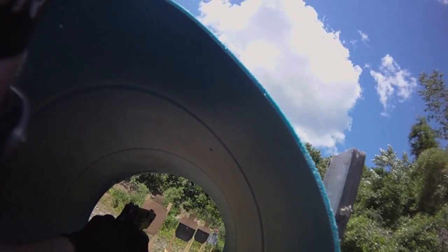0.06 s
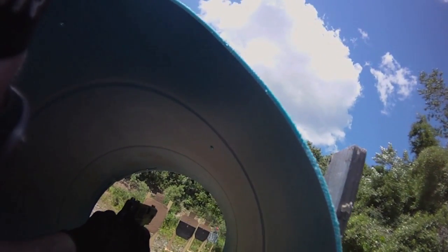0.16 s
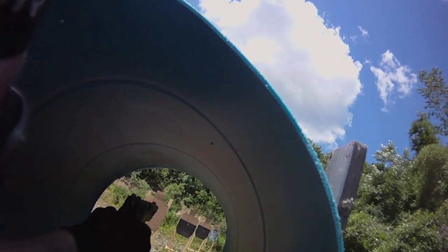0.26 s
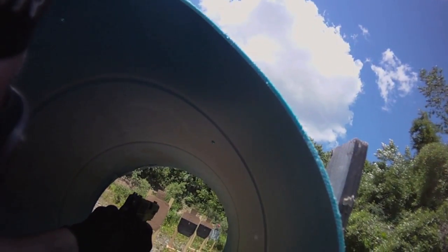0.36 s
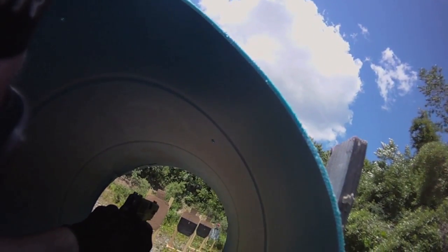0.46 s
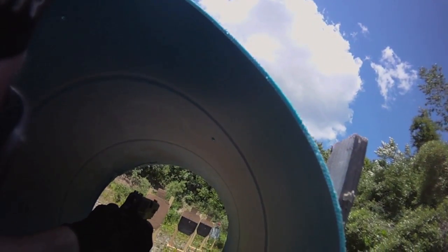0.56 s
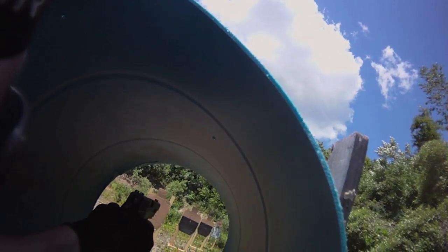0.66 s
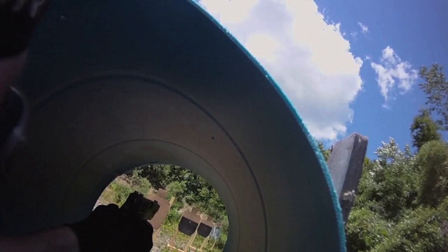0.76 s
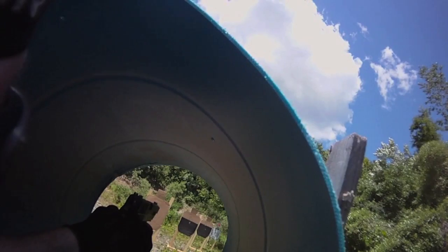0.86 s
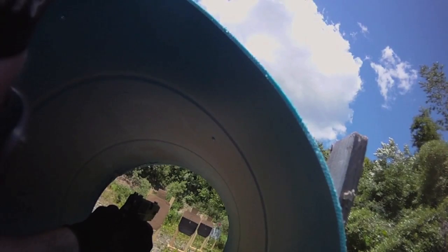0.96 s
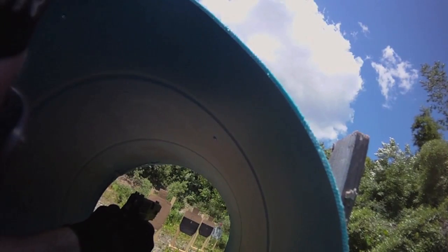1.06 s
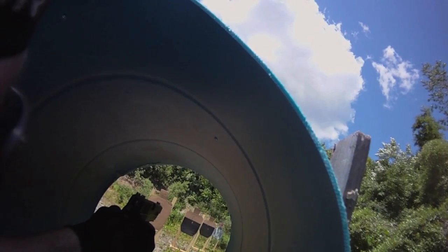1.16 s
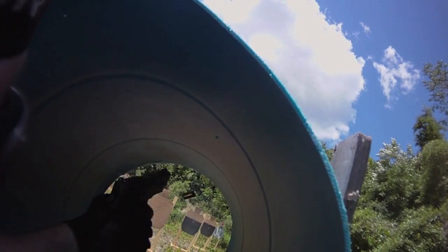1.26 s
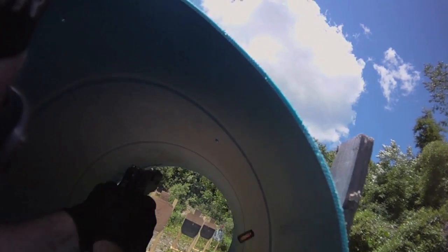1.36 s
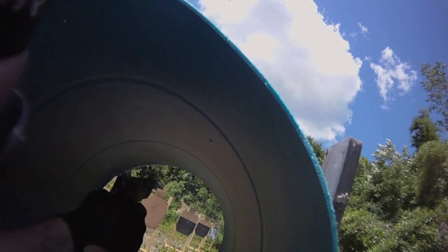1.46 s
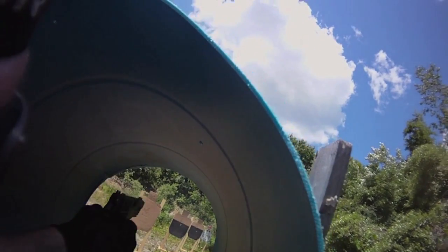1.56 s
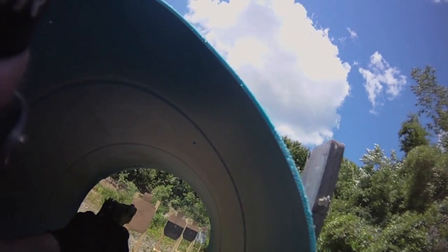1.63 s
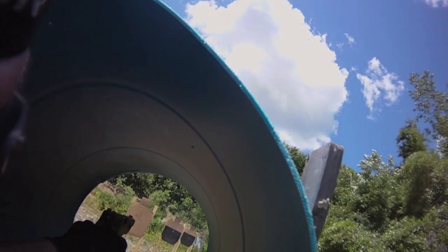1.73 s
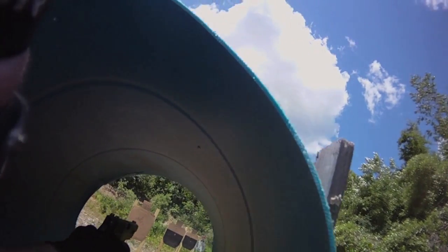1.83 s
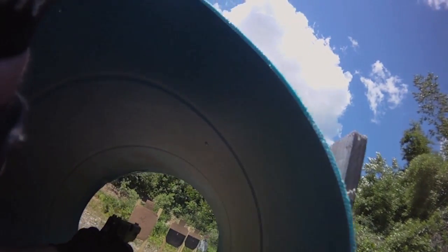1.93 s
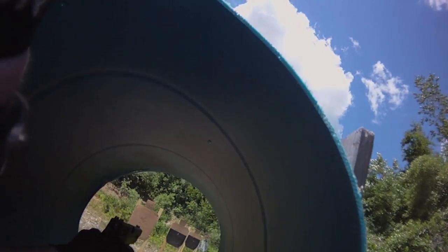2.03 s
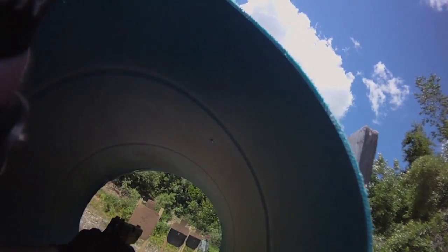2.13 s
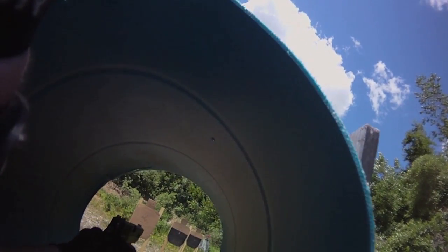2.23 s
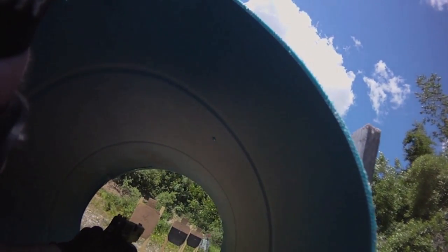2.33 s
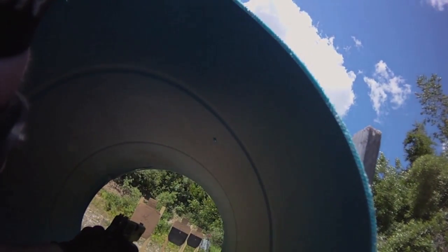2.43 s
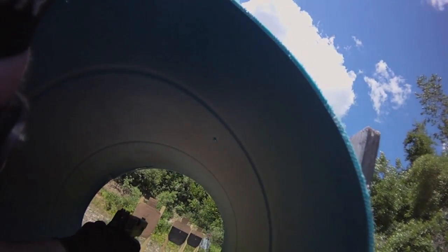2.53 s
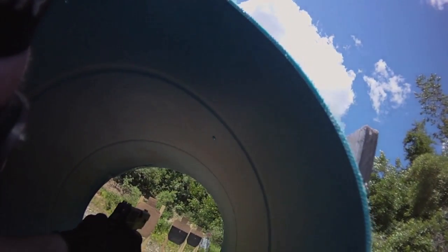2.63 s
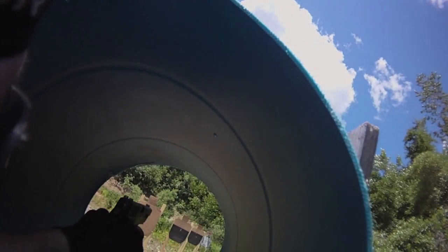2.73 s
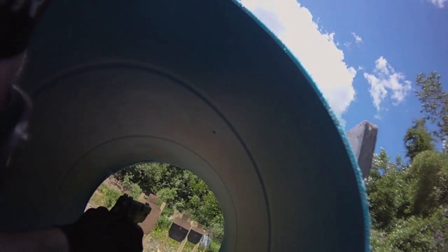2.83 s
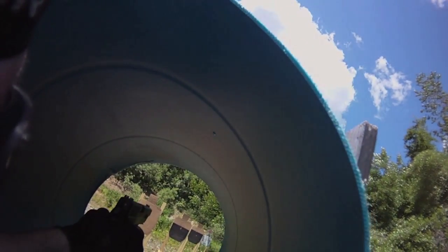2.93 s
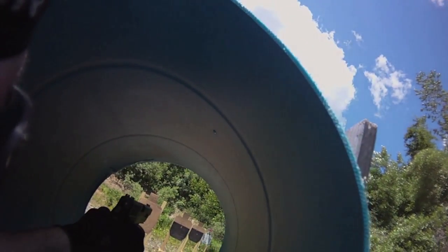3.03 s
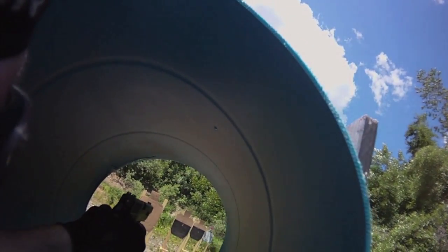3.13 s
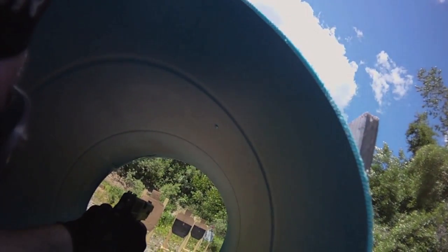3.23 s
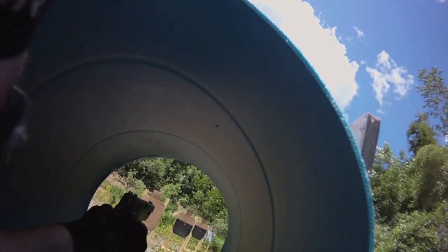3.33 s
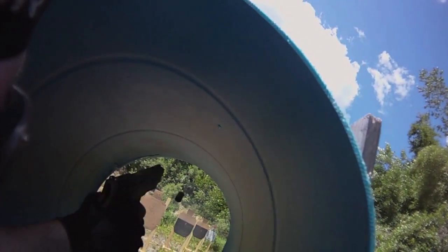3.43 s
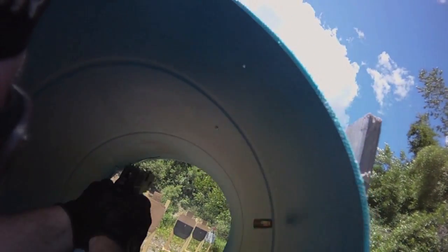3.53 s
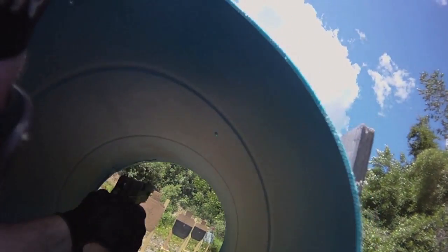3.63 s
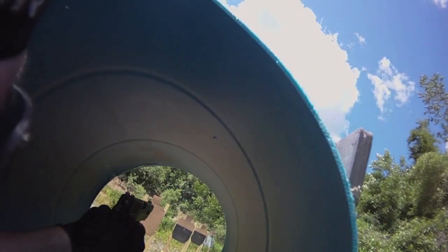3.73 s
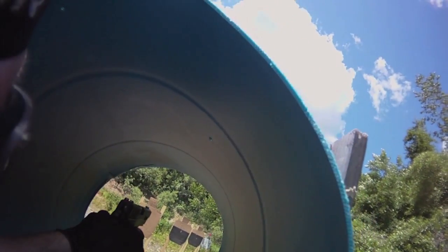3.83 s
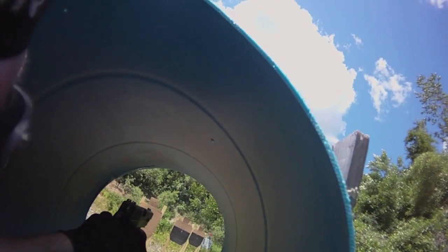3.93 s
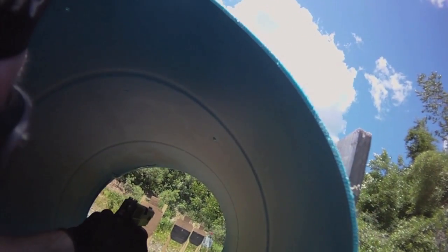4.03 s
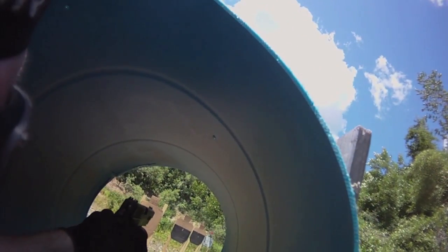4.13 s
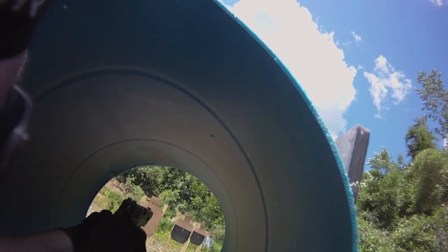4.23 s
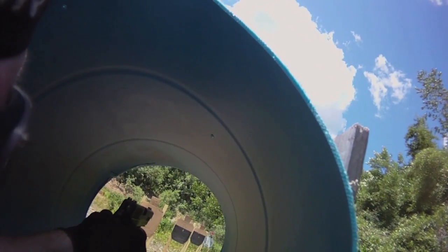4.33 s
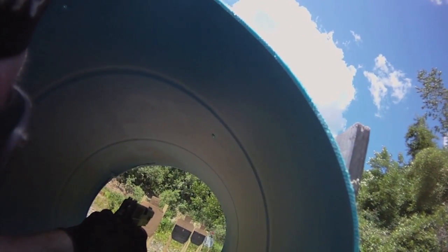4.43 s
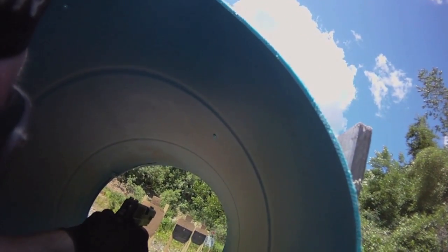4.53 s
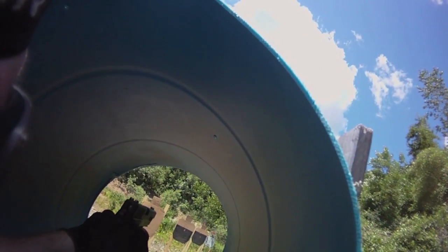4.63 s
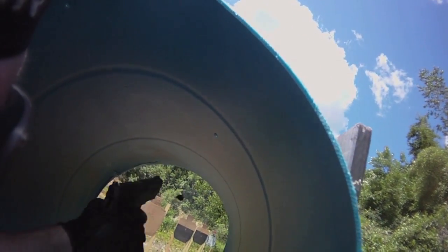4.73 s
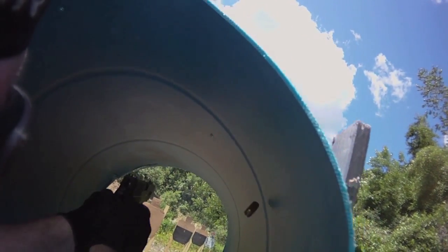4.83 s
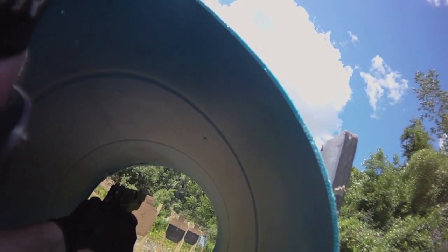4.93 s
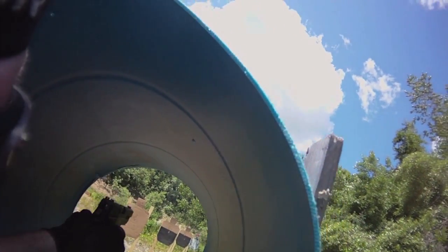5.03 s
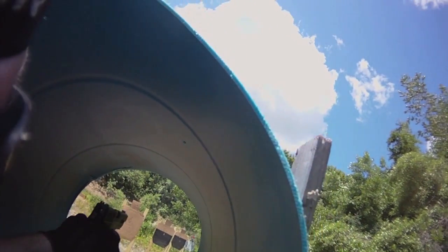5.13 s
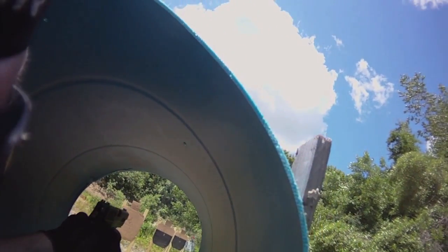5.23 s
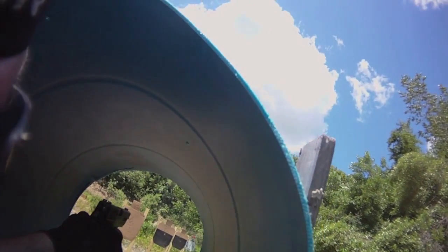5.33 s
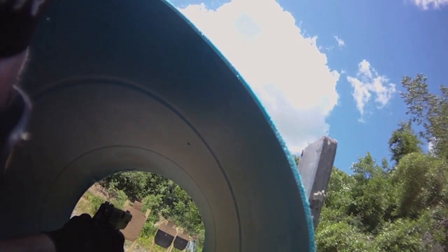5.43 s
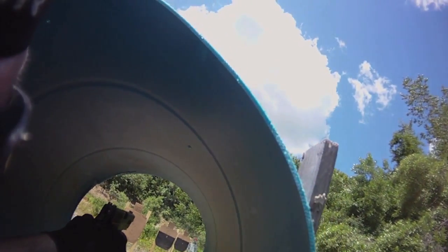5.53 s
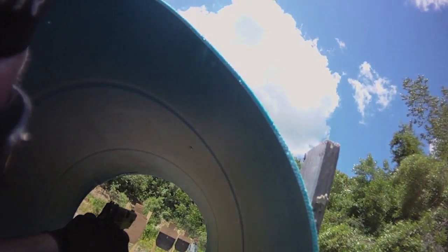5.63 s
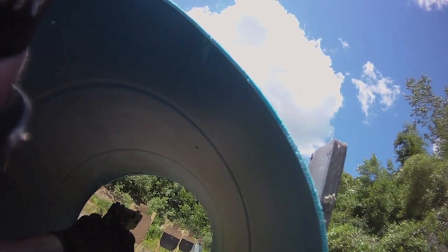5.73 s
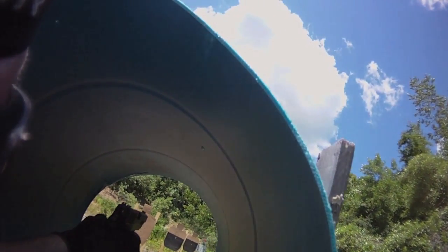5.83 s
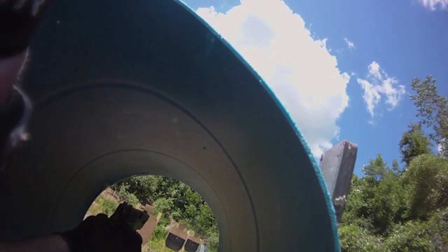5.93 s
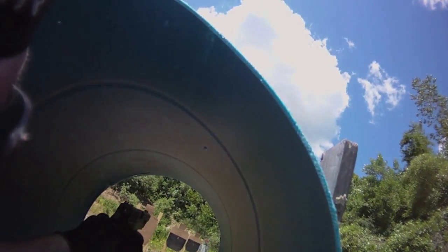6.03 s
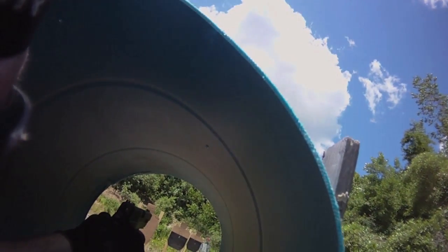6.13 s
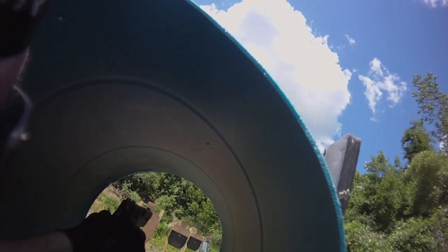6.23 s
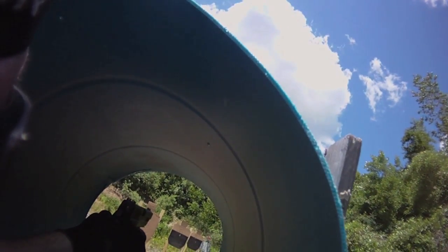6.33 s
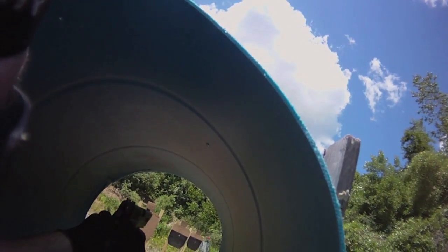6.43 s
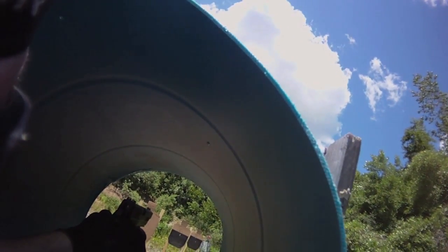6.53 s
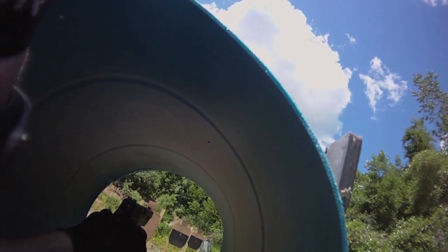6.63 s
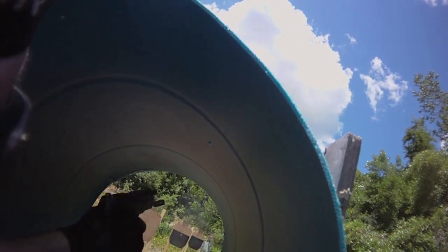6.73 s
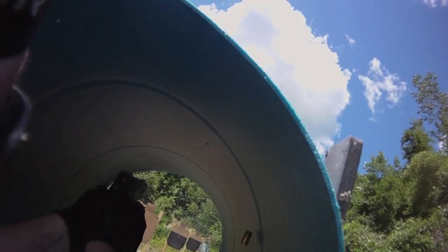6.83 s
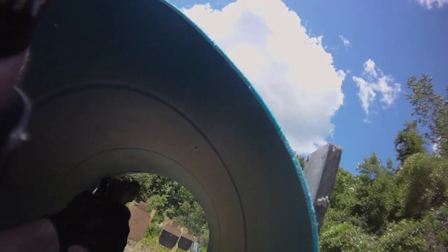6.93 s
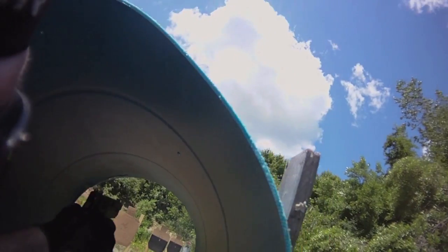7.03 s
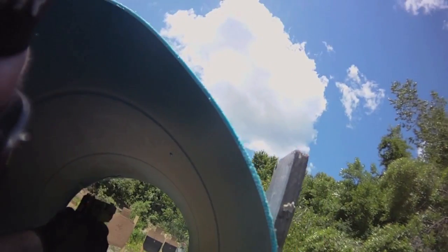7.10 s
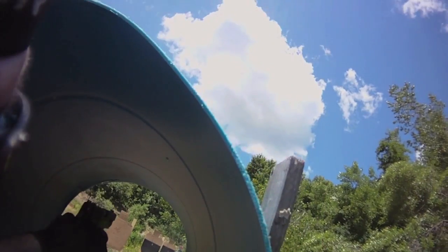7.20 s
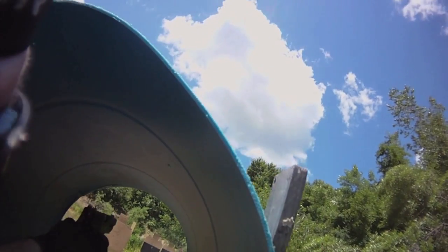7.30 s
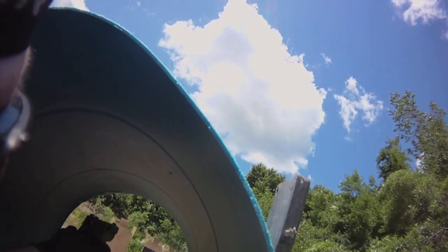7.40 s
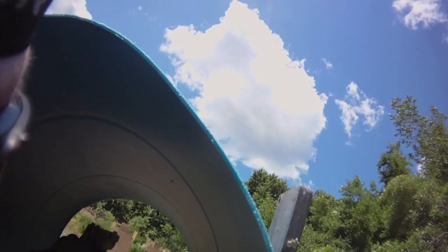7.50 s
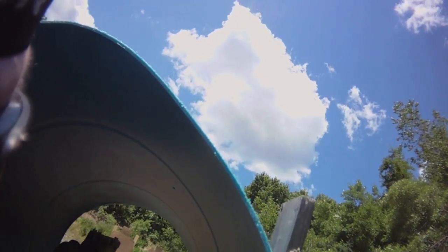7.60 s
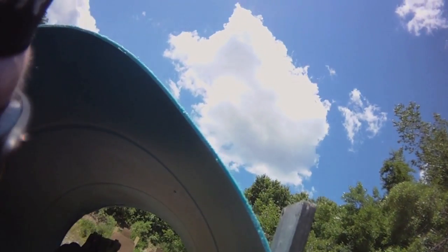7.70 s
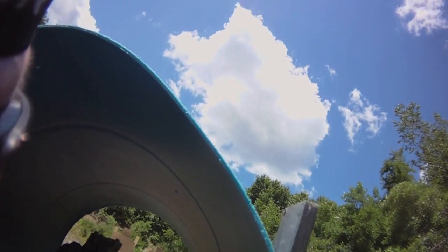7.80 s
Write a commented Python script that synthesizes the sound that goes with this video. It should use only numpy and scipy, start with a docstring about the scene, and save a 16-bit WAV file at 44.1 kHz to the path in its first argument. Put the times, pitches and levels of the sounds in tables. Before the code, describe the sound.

Four loud, hollow pistol shots fired through a plastic barrel outdoors, each echoing away and followed by brass cases clattering and tinkling.

```python
"""An outdoor shooting range, heard at the mouth of a plastic barrel through which a pistol fires four times.
Each blast excites the barrel's air modes, overloads the microphone's limiter and scatters back from
trees and hills. Spent brass cases strike the wall, bounce and ring. Two shots arrive from other bays,
small birds call faintly over a distant rumble, and the barrel is lightly bumped and scuffed."""
import sys
import numpy as np
from scipy import signal
from scipy.fft import rfft, irfft
from scipy.io import wavfile
from scipy.ndimage import uniform_filter1d

SR = 44100
rng = np.random.default_rng(int(sys.argv[2]) if len(sys.argv) > 2 else 0)


def store_wav(level_fs):
    """Save 16-bit WAV to argv[1]."""
    pcm = np.round(np.clip(np.atleast_2d(level_fs), -1, 1) * 32767)
    wavfile.write(sys.argv[1], SR, pcm.T.astype(np.int16))


N = 346626


def gain_of(db):
    """Amplitude ratio of a level; all table levels are relative."""
    return 10 ** (np.asarray(db) / 20)


def unit_rms(x):
    """Normalisation to unit power."""
    return x / np.sqrt(np.mean(x ** 2) + 1e-20)


def clock(length):
    """Sample times over a length in seconds."""
    return np.arange(int(length * SR)) / SR


def add(mix, onset, sound):
    """Superposition: a sound joins the mix at an onset in seconds."""
    part = mix[max(round(onset * SR), 0):][:len(sound)]
    part += sound[:len(part)]


def at_hz(table, hz, column=1):
    """Interpolation of a table column over log frequency."""
    columns = np.transpose(table)
    return np.interp(np.log(hz + 1), np.log(columns[0] + 1), columns[column])


def wander(t, samples):
    """Random fluctuation: a moving average of noise, at unit rms."""
    return unit_rms(uniform_filter1d(rng.standard_normal(len(t)), size=samples))


def hiss(spectrum):
    """Stationary noise with a given spectral density."""
    colour = gain_of(at_hz(spectrum, np.fft.rfftfreq(N, 1 / SR)))
    return irfft(rfft(rng.standard_normal(N)) * colour, N)


def burst(bands, t, hold=0, tilt_db=0, size=512):
    """Frequency-dependent damping: noise holds, then decays band by band. Tilt is in dB per octave."""
    frames = dict(fs=SR, nperseg=size, noverlap=size * 3 // 4)
    hz, times, noise = signal.stft(rng.standard_normal(len(t)), **frames)
    colour_db = at_hz(bands, hz) + tilt_db * np.log2((hz + 100) / 3000)
    fall_db = 60 * np.maximum(times - hold, 0) / at_hz(bands, hz, column=2)[:, None]
    return signal.istft(noise * gain_of(colour_db[:, None] - fall_db), **frames)[1][:len(t)]


def ring(modes, t, phase=0):
    """Free vibration: one damped sinusoid per mode, each in its own row."""
    hz, db, t60 = np.transpose(modes)[:, :, None]
    return gain_of(db - 60 * t / t60) * np.cos(2 * np.pi * hz * t + phase)


def cut(x, hz, kind):
    """Fourth-order high-pass or low-pass filtering."""
    return signal.sosfilt(signal.butter(4, hz, kind, fs=SR, output="sos"), x)


# Spectral densities of still air and distant rumble: f/Hz, level/dB
AIR_SPECTRUM = [(18, -51.5), (30, -16), (108, -7.5), (208, -12), (420, -2.5), (532, -0.5), (1140, -12.5),
                (1360, -7), (2130, -13.5), (2550, -11.5), (2990, -15.5), (4090, -14.5), (6210, -18),
                (14300, -21.5), (15500, -29.5)]
RUMBLE_SPECTRUM = [(60, -23), (280, -15.5), (560, 5.5), (750, -4.5), (1100, -11.5), (2200, -13),
                   (4000, -24), (5500, -37), (12000, -45.5)]
# Envelope of the rumble: t/s, level/dB
RUMBLE_ENVELOPE = [(0, -42), (.3, -45.5), (1.202, -53), (2.003, -57.5), (2.9, -66.5), (6.4, -67),
                   (6.751, -59), (7.8, -49.5)]
def background(air_db=-70.5):
    """Ambient noise: steady summer air under a distant rumble that fades and returns."""
    rumble_db = np.interp(np.arange(N) / SR, *np.transpose(RUMBLE_ENVELOPE))
    return gain_of(air_db) * unit_rms(hiss(AIR_SPECTRUM)) + gain_of(rumble_db) * hiss(RUMBLE_SPECTRUM)


# Air modes of the barrel, apart from its beating pair: f/Hz, level/dB, T60/s
BARREL_MODES = [(170, -16, .42), (630, -3, .13), (732, -4, .28), (996, 2, .22), (1262, 2, .21),
                (1525, 0, .14), (1700, 3, .1), (1764, -2, .25), (1812, 5, .11), (1953, 7, .115),
                (2049, 1.5, .25), (2200, 2, .1), (2334, 8, .11), (2500, 5, .145), (2742, -1, .22),
                (2782, 5, .15), (2950, 1, .1), (3028, -.5, .29), (3130, 6, .11), (3309, -4, .3),
                (3400, 2, .1), (3540, 7, .105), (3605, 5, .135), (3715, 3.5, .115), (3864, 0, .19),
                (4030, 1, .1), (4120, -4, .17), (4480, -3, .16)]
def barrel_resonance(x, resonance_db=-4):
    """Forced vibration: outside sound weakly drives the cavity's modes and turns hollow."""
    response = ring(BARREL_MODES, clock(.4)).sum(0)
    response /= abs(rfft(response)).max()
    return x + gain_of(resonance_db) * signal.fftconvolve(x, response)[:N]


def wall_reflections(x, count=10):
    """Comb filtering: treble reflects around the curved wall and interferes with the direct sound."""
    taps = np.zeros(600)
    taps[rng.integers(20, 450, count)] = .16 * rng.choice([-1, 1], count)
    return x + signal.oaconvolve(x, cut(taps, 4300, "high"))[:N]


# Bird notes: t/s, start f/Hz, end f/Hz, level/dB
BIRD_NOTES = [(.085, 3940, 4200, -67), (.64, 6300, 6500, -69), (.895, 3520, 3000, -58.5),
              (.985, 2310, 2090, -64), (2.4, 4800, 5200, -68), (2.715, 2134, 1900, -66.5)]
def bird(start_hz, end_hz, db, note_s=.033):
    """Scattering by foliage blurs a short gliding whistle."""
    hz = np.linspace(start_hz, end_hz, len(clock(note_s)))
    note = np.sin(2 * np.pi * np.cumsum(hz) / SR) * np.hanning(len(hz))
    delay = clock(.3)
    leaves = rng.standard_normal(len(delay)) * np.exp(-delay / .05)
    paths = (delay == 0) + .33 * leaves / np.linalg.norm(leaves)
    return gain_of(db) * signal.fftconvolve(note, paths)


# Modes of an empty brass case: f/Hz, level/dB, T60/s
BRASS_MODES = [(11370, -3.5, 0.41), (11400, -7, 0.08)]
def tinkle(db, detune=.0042, tumble_hz=38, settle_db=-13, settle_s=.065):
    """Amplitude modulation: tumbling flutters the ring of a case, soon damped to a faint afterring."""
    t = clock(.4)
    flutter = 1 + .35 * np.sin(2 * np.pi * (tumble_hz * t + rng.random()))
    damped_db = settle_db * (1 - np.exp(-(t / settle_s) ** 2))
    brass = ring(BRASS_MODES, t * (1 + detune * rng.standard_normal())).sum(0)
    return gain_of(db + damped_db) * flutter * brass


# Noise bands of a metal click and of the wall's rattle: f/Hz, level/dB, T60/s
CLICK_BANDS = [(150, -34, 0.018), (500, -12.5, 0.022), (1200, -15.5, 0.014), (2480, 1, 0.017),
               (4800, -2, .014), (8200, -10, 0.0063), (15300, -18.5, 0.015)]
RATTLE_BANDS = [(151, -85, 0.07), (564, -3, 0.15), (985, -7, 0.11), (2500, -3.5, 0.16), (4200, -10, 0.11),
                (8200, -19, .09), (15000, -32, .08)]
def contact(db, flat_db, tilt_db, rattle_db=7.5):
    """Impact excitation: a case clicks on the barrel and the wall answers hollowly."""
    t = clock(.3)
    click = burst(CLICK_BANDS, t, hold=.0014, tilt_db=tilt_db, size=128)
    rattle = gain_of(rattle_db + flat_db) * burst(RATTLE_BANDS, t, tilt_db=tilt_db)
    return gain_of(db) * cut(click + rattle, 380, "high")  # click and rattle carry nothing below about 380 Hz


# Landings: t/s, impact level/dB, flatness (0 on the rim, 1 on the side), ring level/dB, tilt/(dB/octave)
CASE_LANDINGS = [(.19, -49.5, 0, -63, 6), (1.5778, -12, 0.44, -38, -4), (1.7195, -24.5, .1, -52, -5),
                 (1.7355, -18.5, 0.47, -60, -2), (1.8582, -28, 0.99, -60, -6.5),
                 (2.593, -49.5, 0.27, -65, -2), (3.599, -8, 0.59, -40, -4),
                 (3.7688, -13.5, 0.58, -53, -3.5), (4.9122, -18, 0.16, -39, 0.5),
                 (5.0439, -24.5, 0.21, -54, 2), (5.1163, -8, 0.13, -34, -3.5),
                 (5.228, -23.5, 0.81, -56, -5.5), (5.995, -43.5, 0.56, -73, -7.5),
                 (6.1709, -30.5, 0.13, -59, -7.5), (7.063, -12.5, 0, -58, -5.5),
                 (7.0873, -15.5, 0.35, -51, -2.5), (7.2015, -23.5, 0.37, -27, 3),
                 (7.6016, -40.5, 0.12, -49, -7)]
# The other end slaps down, then the case hops: delay t/s, level/dB
REBOUNDS = [(.012, -4), (.043, -7)]
def case_landing(db, flatness, brass_db, tilt_db, rim_db=-22, rebound_rattle_db=-5):
    """Inelastic collision: a case lands and rings; the flatter it falls, the more it rattles and hops."""
    flat_db = rim_db * (1 - np.clip(flatness, 0, 1))
    sound = tinkle(brass_db)
    add(sound, 0, contact(db, flat_db, tilt_db))
    for delay, rebound_db in REBOUNDS:
        add(sound, delay, contact(db + rebound_db + flat_db, flat_db + rebound_rattle_db, tilt_db))
    return sound


def thump(t, push_s=.0025, top_hz=170):
    """A pressure pulse rounded by distance: compression, then a longer rarefaction."""
    return cut((1 - t / push_s) * np.exp(-t / push_s), top_hz, "low")


# A distant shot's thud modes in the barrel, crack bands and tail bands: f/Hz, level/dB, T60/s
THUD_MODES = [(115, -22, .07), (720, -7, .045), (890, -14, .065)]
CRACK_BANDS = [(40, -18, 0.058), (130, 9, 0.025), (300, 4, 0.032), (534, 10, 0.22), (870, 17.5, 0.034),
               (1220, -40, 0.065), (1700, 5, 0.045), (4030, -47, 0.017), (5340, -46, 0.022),
               (12000, -64, .05)]
TAIL_BANDS = [(50, -52, .5), (120.4, -11.5, .35), (293.6, -25.5, 4.5), (575.4, 0.5, 3), (1080, -18, 1.7),
              (1570, -13, 1.6), (3882, -28, 0.64), (5200, -46.5, 0.83), (11700, -74, 0.49)]
# Shots in other bays: t/s, crack level/dB, tail level/dB, tilt/(dB/octave), bass level/dB
DISTANT_SHOTS = [(.311, -33, -21.5, 2.5, -37), (7.728, -12.5, -16, 2, -29)]
def distant_shot(crack_db, tail_db, tilt_db, bass_db, echo_s=.055):
    """Reflection and scattering: a dull crack, one slap echo from a berm, and a long uneven tail."""
    t = clock(2.5)
    thud = ring(THUD_MODES, t, np.pi / 2).sum(0)
    snap = burst(CRACK_BANDS, t, hold=.0057, tilt_db=tilt_db, size=256)
    crack = gain_of(crack_db) * (thud + gain_of(-4) * snap)
    bass = gain_of(bass_db) * thump(t)
    lumps_db = 1.7 * wander(t, samples=500)
    tail = gain_of(tail_db + lumps_db) * burst(TAIL_BANDS, t, hold=.082, tilt_db=tilt_db)
    sound = crack + bass + tail
    add(sound, echo_s, gain_of(-15.5) * crack + gain_of(-12) * bass)  # the berm reflects bass best
    return sound * (1 - np.exp(-t / .00097))


def whoop(t, start_hz=8000, end_hz=1500, glide_s=.0043, level_db=11, length_s=.022):
    """Dispersion: waves spiralling along the barrel arrive later the lower they are."""
    hz = end_hz + (start_hz - end_hz) * np.exp(-t / glide_s)
    hz *= 1 + .16 * wander(t, samples=24)
    envelope = gain_of(level_db) * np.sin(np.pi * np.minimum(t / length_s, 1))
    return envelope * np.sin(2 * np.pi * np.cumsum(hz) / SR)


# Noise bands of the muzzle blast and of its wash in the barrel: f/Hz, level/dB, T60/s
BLAST_BANDS = [(30, -7, 0.065), (120, 6.5, .14), (384, 11, 0.16), (1010, 14, 0.071), (2100, 20.5, 0.096),
               (3860, 24.5, .08), (4800, 20, 0.06), (9000, 14.5, 0.053), (16600, 6.5, 0.045)]
WASH_BANDS = [(40, -6, 0.061), (198, -0.5, 0.2), (590, 6.5, 0.32), (1170, 1.5, 0.22), (2000, 4.5, 0.2),
              (3960, 10, 0.099), (5070, -2.5, 0.21), (6860, -5.5, 0.3), (10000, -11.5, 0.18),
              (15000, -19, .2)]
# The barrel's beating pair of swirling modes: f/Hz, level/dB, T60/s
BEATING_PAIR = [(442, 8, .215), (456.5, 8, .215)]
# Pistol shots: t/s, level/dB, outdoor tail level/dB, barrel mode level/dB
PISTOL_SHOTS = [(1.3097, -1, 0.5, -6), (3.4761, -1, -0.5, -4.5), (4.783, -0.5, -0.5, -6),
                (6.8053, 1.5, -2, -5)]
def pistol(modes_db, boom_db=1, damping_per_s=.6, slide_s=.052):
    """Impulse response of a cavity: the muzzle blast sets the air in the barrel ringing."""
    t = clock(.9)
    blast = burst(BLAST_BANDS, t, hold=.0049, size=256) + whoop(t) + burst(WASH_BANDS, t)
    # the pair starts in antiphase and builds gradually, so its beating swells twice
    lower, higher = ring(BEATING_PAIR, t)
    boom = gain_of(boom_db) * (lower - higher) * (1 - np.exp(-(t / .04) ** 2))
    # the muzzle sits differently for each shot, which changes the mix of the other modes
    shares = gain_of(modes_db + 1.5 + rng.standard_normal(len(BARREL_MODES)))
    phases = rng.uniform(0, 2 * np.pi, (len(BARREL_MODES), 1))
    modes = shares @ ring(BARREL_MODES, t, phases) * np.exp(-damping_per_s * t)
    sound = (blast + modes) * (1 - np.exp(-t / .0031)) + boom
    # the slide slams shut on the next round
    add(sound, slide_s, gain_of(-7) * burst(CLICK_BANDS, t, hold=.0022, tilt_db=2.5, size=128))
    return sound


# Noise bands returned by trees and by hills: f/Hz, level/dB, T60/s
TREE_BANDS = [(40, -41.5, 0.46), (111, -31.5, 0.3), (164.5, -12.5, 1.4), (223, -26.5, 0.88), (361, -7, 1),
              (550, -2.5, 1.4), (800, -9.5, 1.15), (1900, -8.5, 0.96), (3380, -12, 0.87), (3800, -7, 0.84),
              (4800, -20, .78), (7100, -26, 0.94), (9200, -26.5, 0.42), (15000, -31.5, 0.46)]
HILL_BANDS = [(60, -61.5, 1.2), (280, -44.5, 2.8), (527, -27, 3.3), (900, -26.5, 3), (2200, -34.5, 2.8),
              (4300, -44, 3.1), (5270, -55, 1.6), (12000, -65, 0.67)]
def terrain_echoes(tail_db, wood_edge_s=.295, last_slope_s=1.4):
    """Backscatter: a shot returns in lumps from trees and hills, with a swell from the wood's edge."""
    t = clock(2.6)
    lumps_db = 1.6 * wander(t, samples=900)
    edge_db = 1.7 * np.exp(-((t - wood_edge_s) / .065) ** 2)
    reach = 1 / (1 + np.exp((t - last_slope_s) / .055))  # hill echoes end at the farthest slope
    tail = burst(TREE_BANDS, t, size=1024) + burst(HILL_BANDS, t) * reach
    return tail * gain_of(tail_db + lumps_db + edge_db) * (1 - np.exp(-t / .016))


def loose_brass(eject_s=.12, roll_s=(.63, 1.4), touches=2):
    """Free vibration: the ejected case rings in flight, then faintly touches the wall as it rolls."""
    sound = np.zeros(2 * SR)
    add(sound, eject_s, tinkle(db=-40.5))
    for onset in rng.uniform(*roll_s, touches):
        add(sound, onset, case_landing(db=-66, flatness=0, brass_db=-69.5, tilt_db=-4))
    return sound


# Light bumps on the barrel: t/s, level/dB, f/Hz
BARREL_KNOCKS = [(2.805, -42.5, 769), (2.979, -54.5, 350)]
def knock(db, hz, t60=.01):
    """Heavy damping: bumped plastic rings for only a few cycles."""
    return ring([(hz, db, t60)], clock(.1), np.pi / 2)[0]


# Spectral density of rubbing: f/Hz, level/dB
SCUFF_SPECTRUM = [(60, -35), (260, -47), (400, -6), (600, -3.5), (950, -21), (2300, -20), (4200, -36),
                  (9000, -52)]
# Scuffs: t/s, duration/s, level/dB
ARM_SCUFFS = [(5.93, 0.28, -35.5), (6.13, 0.11, -27.5)]
def scuff(length, db):
    """Friction noise: the shooter's arm rubs the barrel in one short, hollow swell."""
    count = len(clock(length))
    return gain_of(db) * np.hanning(count) * hiss(SCUFF_SPECTRUM)[:count]


def scene():
    """Superposition: the pistol joins all that the barrel colours, and both reflect around its wall."""
    near, around = np.zeros(N), background()
    for onset, db, tail_db, modes_db in PISTOL_SHOTS:
        add(near, onset, gain_of(db) * pistol(modes_db))
        add(around, onset, gain_of(db) * terrain_echoes(tail_db))
        add(around, onset, loose_brass())
    for table, source in ((CASE_LANDINGS, case_landing), (DISTANT_SHOTS, distant_shot),
                          (BARREL_KNOCKS, knock), (ARM_SCUFFS, scuff), (BIRD_NOTES, bird)):
        for onset, *settings in table:
            add(around, onset, source(*settings))
    return wall_reflections(near + barrel_resonance(around))[None]


def record(dry, limit_db=-2, recovery_db_per_s=185, ceiling=.88, top_hz=15750):
    """Overload: a limiter ducks at each blast and recovers, peaks saturate, and the band is limited."""
    power_db = 10 * np.log10(abs(uniform_filter1d(dry[0] ** 2, size=130)) + 1e-12)
    recovery_db = np.arange(N) / SR * recovery_db_per_s
    held_db = np.maximum.accumulate(power_db + recovery_db) - recovery_db
    over_db = np.maximum(held_db - limit_db, 0)
    ducked = dry / gain_of(uniform_filter1d(over_db, size=40))
    saturated = ducked / (1 + (ducked / ceiling) ** 4) ** (1 / 4)
    lowpass = signal.firwin(255, top_hz, window=("kaiser", 9), fs=SR)
    return signal.oaconvolve(saturated, lowpass[None], "same")


dry = scene()
out = record(dry)
store_wav(out)
```